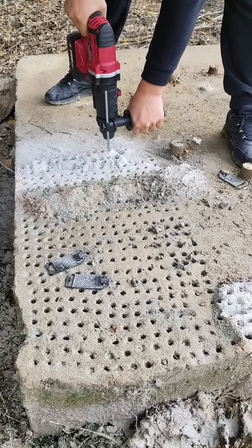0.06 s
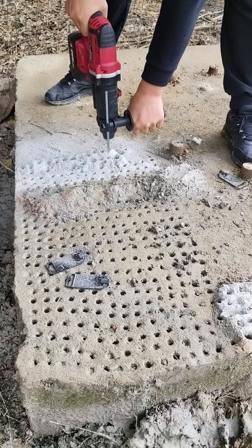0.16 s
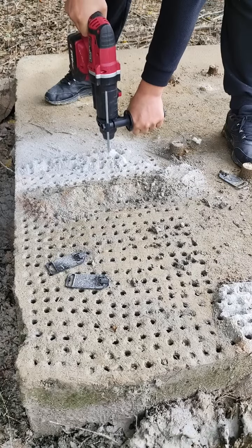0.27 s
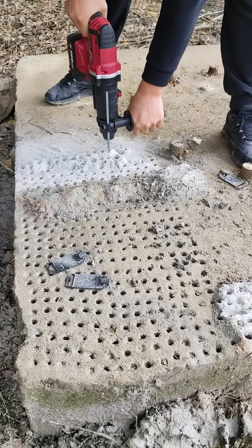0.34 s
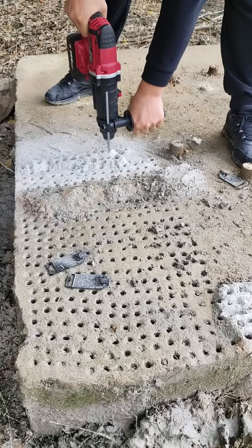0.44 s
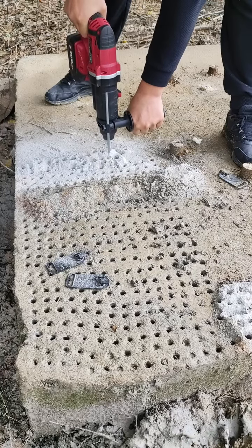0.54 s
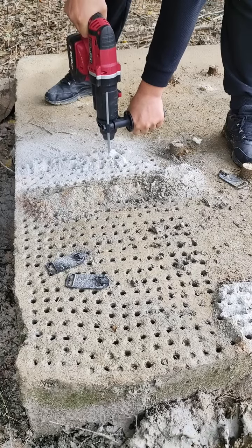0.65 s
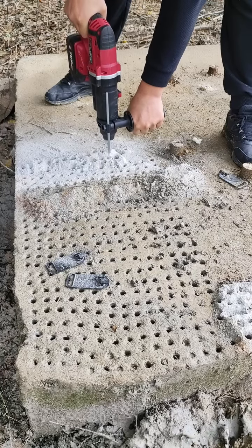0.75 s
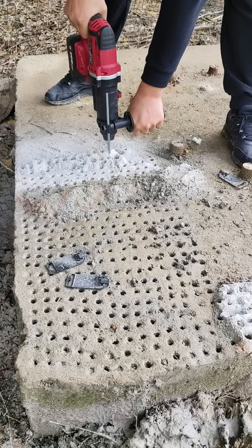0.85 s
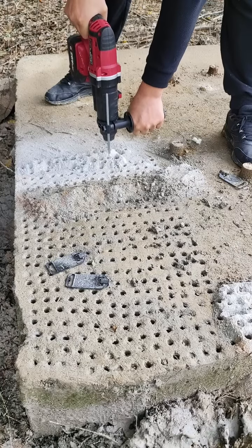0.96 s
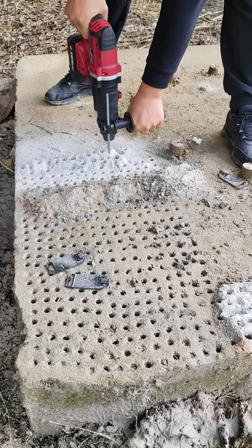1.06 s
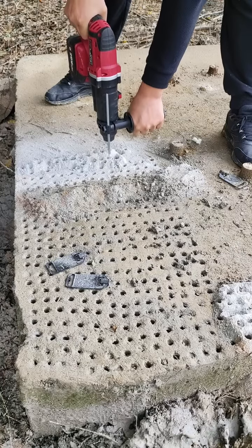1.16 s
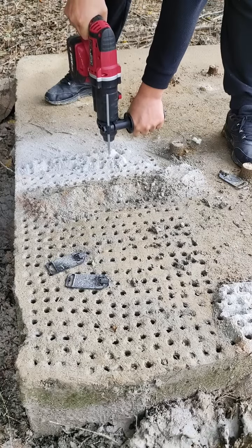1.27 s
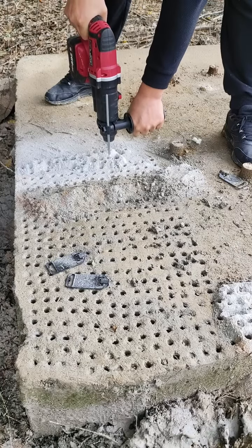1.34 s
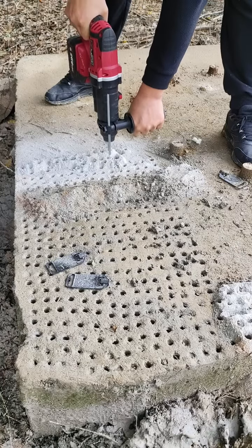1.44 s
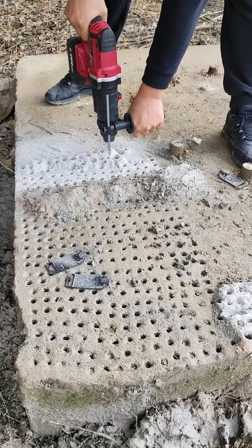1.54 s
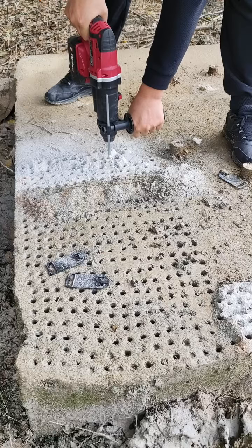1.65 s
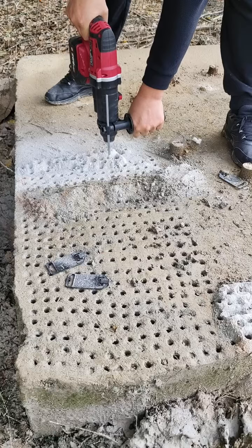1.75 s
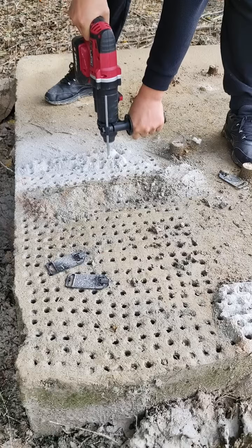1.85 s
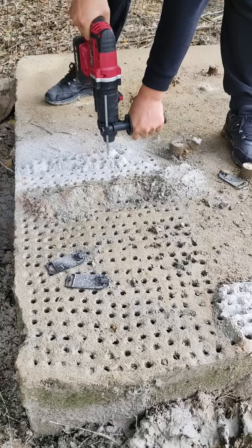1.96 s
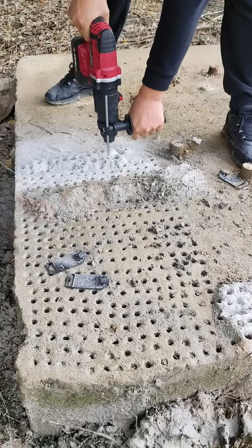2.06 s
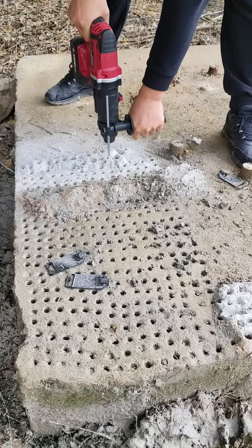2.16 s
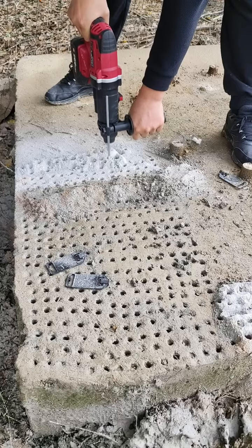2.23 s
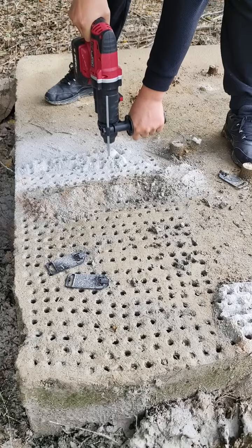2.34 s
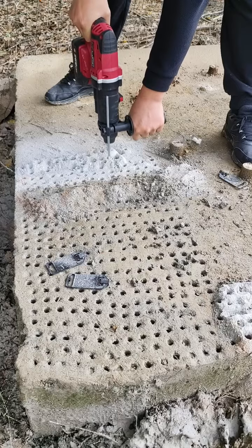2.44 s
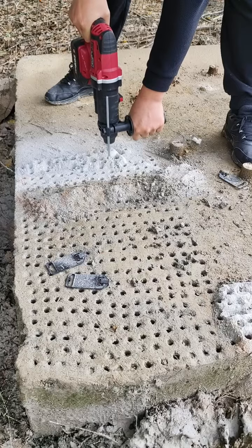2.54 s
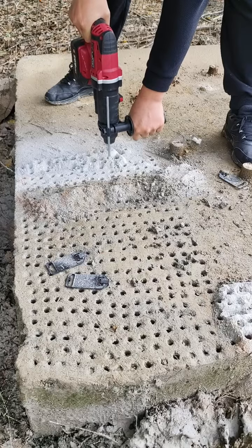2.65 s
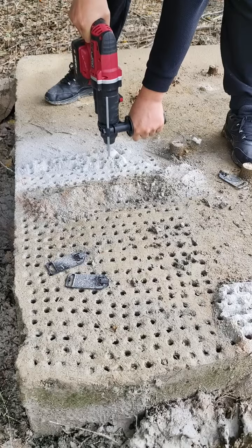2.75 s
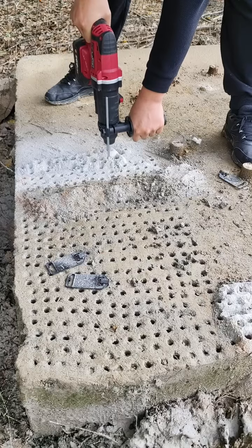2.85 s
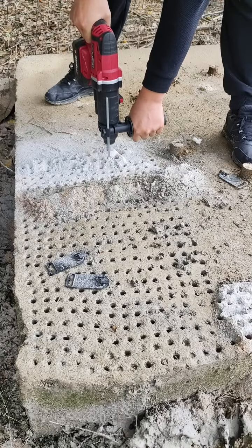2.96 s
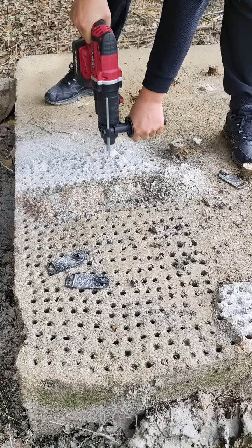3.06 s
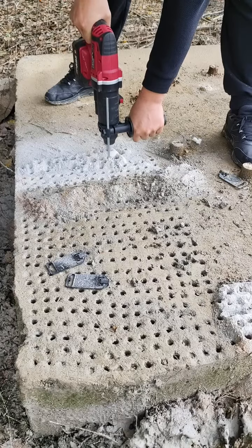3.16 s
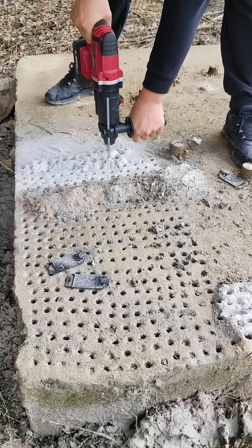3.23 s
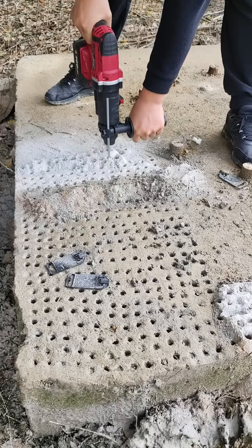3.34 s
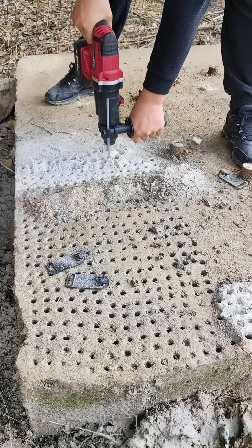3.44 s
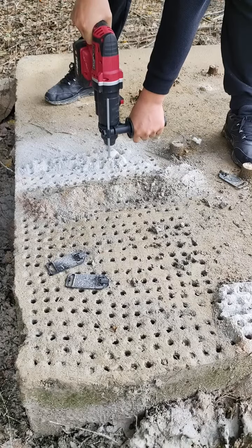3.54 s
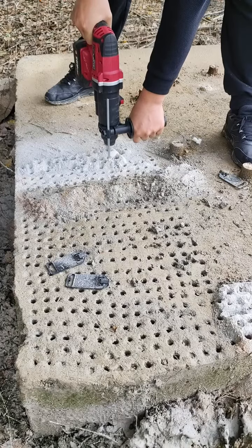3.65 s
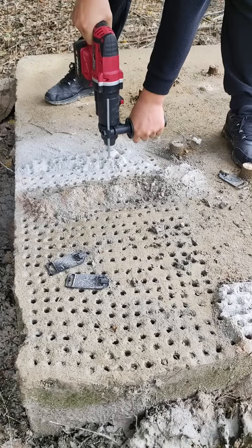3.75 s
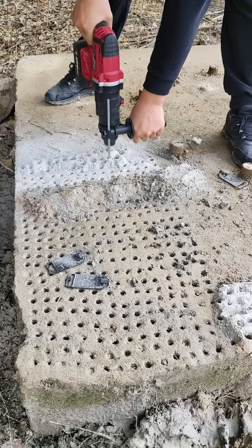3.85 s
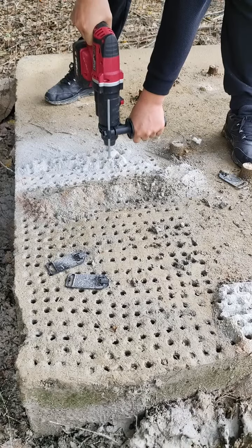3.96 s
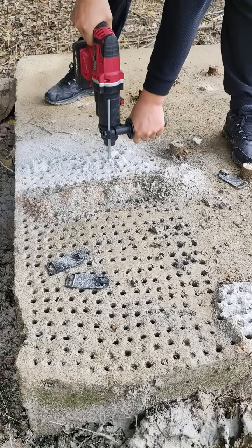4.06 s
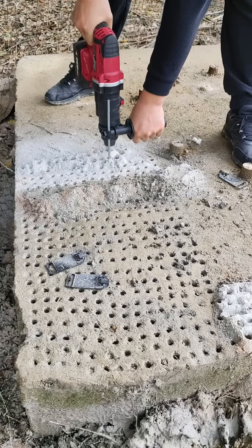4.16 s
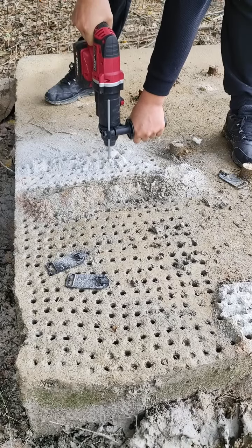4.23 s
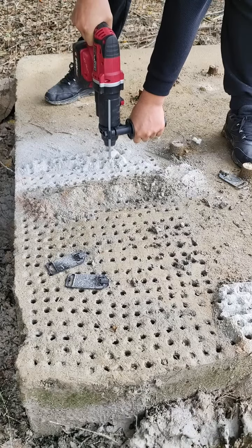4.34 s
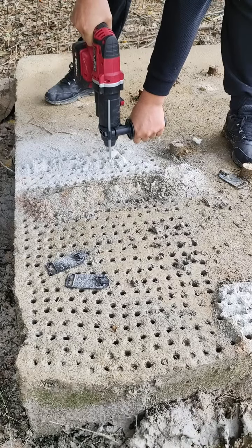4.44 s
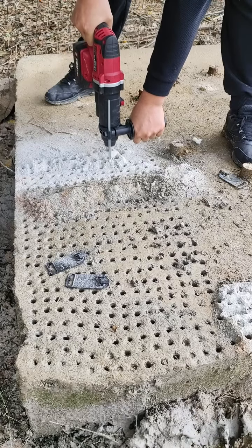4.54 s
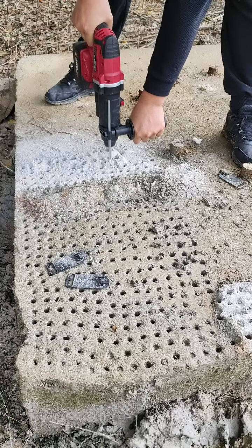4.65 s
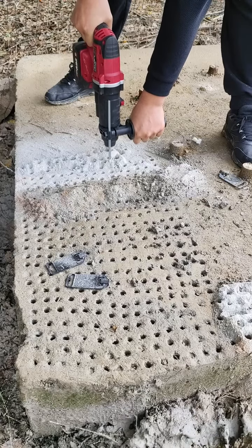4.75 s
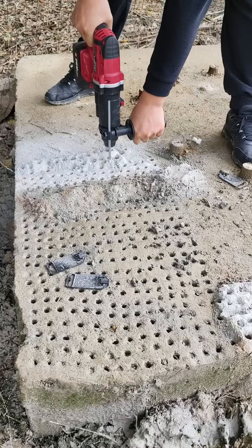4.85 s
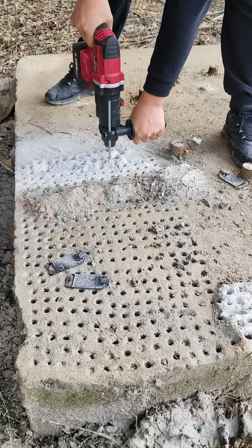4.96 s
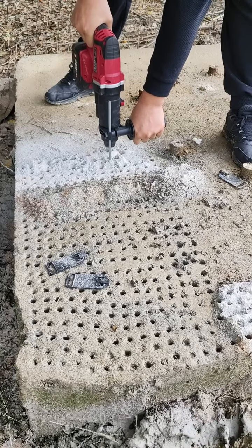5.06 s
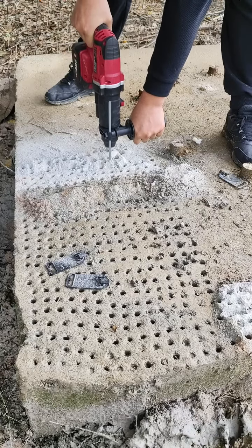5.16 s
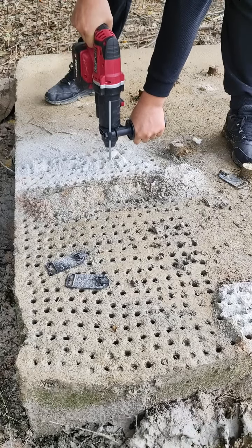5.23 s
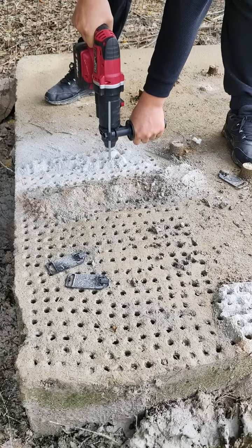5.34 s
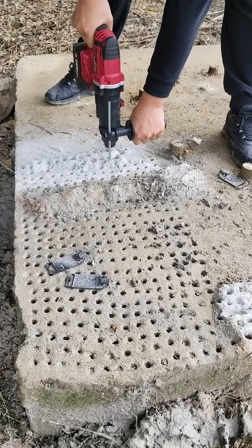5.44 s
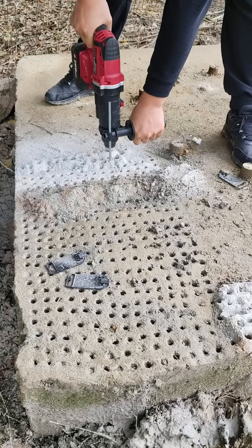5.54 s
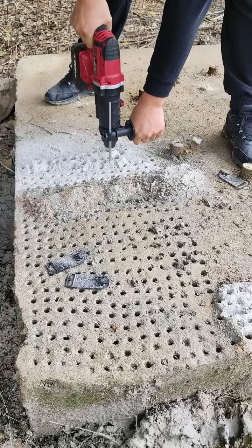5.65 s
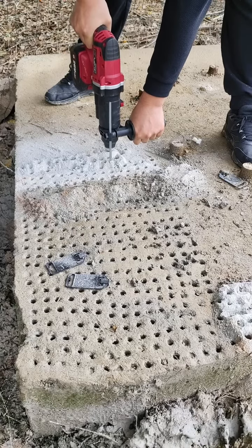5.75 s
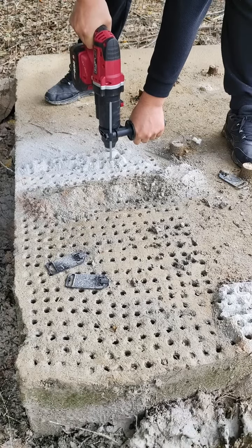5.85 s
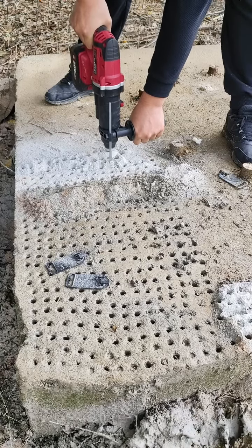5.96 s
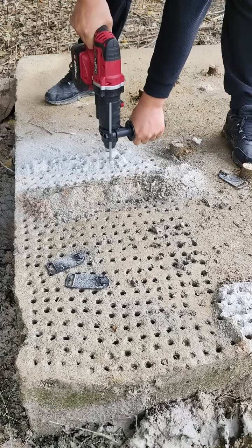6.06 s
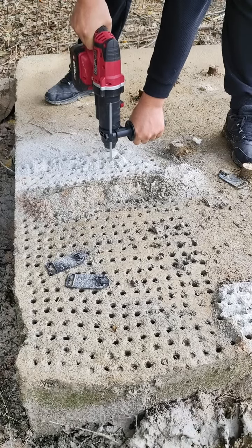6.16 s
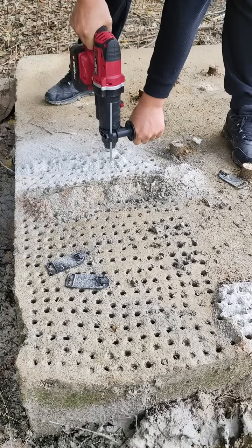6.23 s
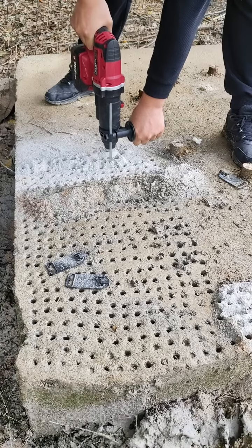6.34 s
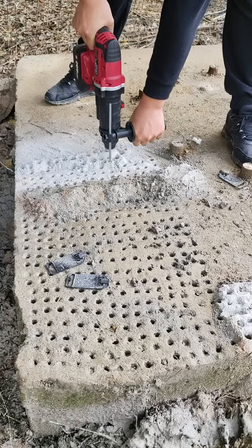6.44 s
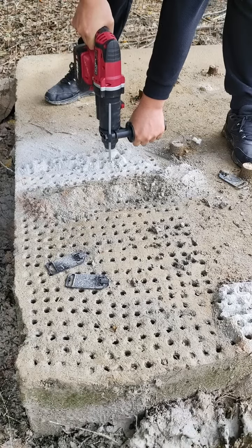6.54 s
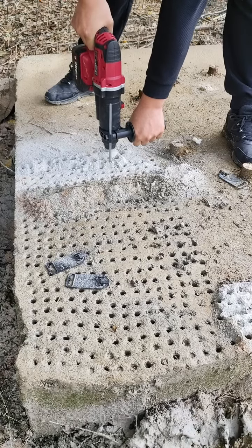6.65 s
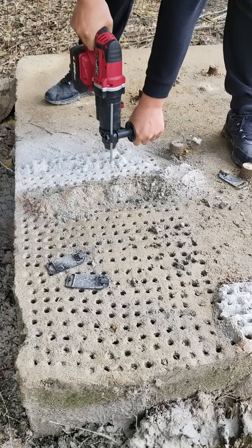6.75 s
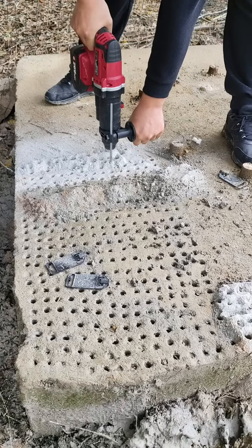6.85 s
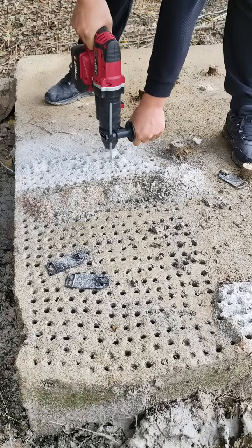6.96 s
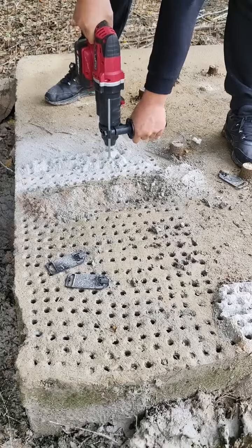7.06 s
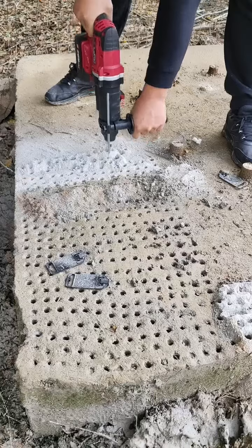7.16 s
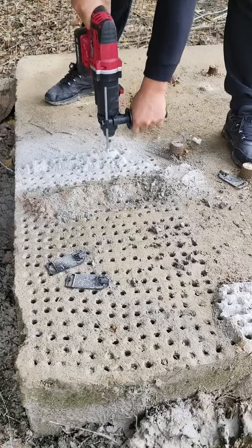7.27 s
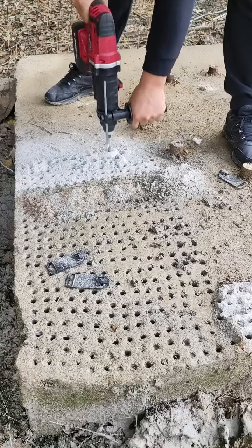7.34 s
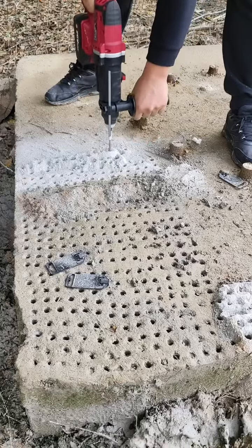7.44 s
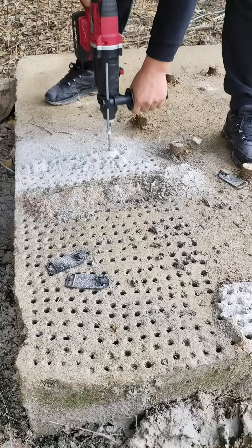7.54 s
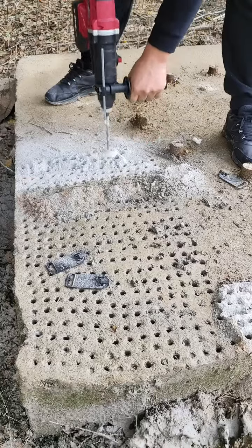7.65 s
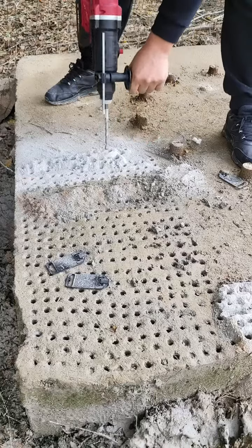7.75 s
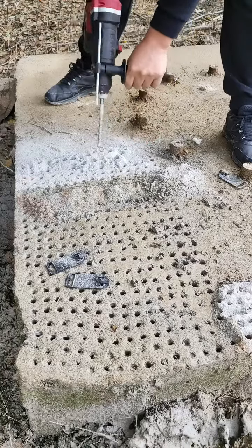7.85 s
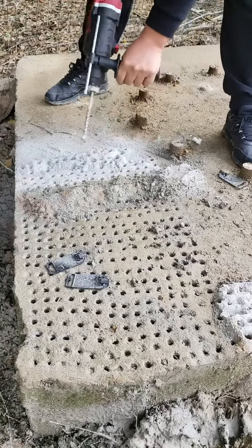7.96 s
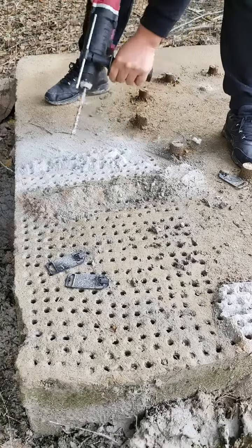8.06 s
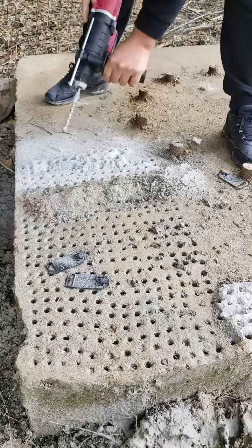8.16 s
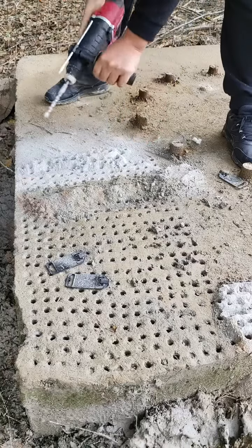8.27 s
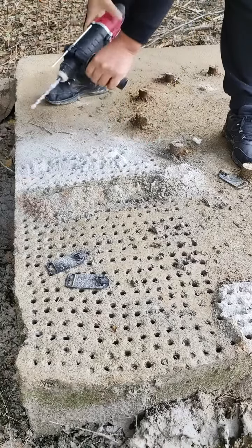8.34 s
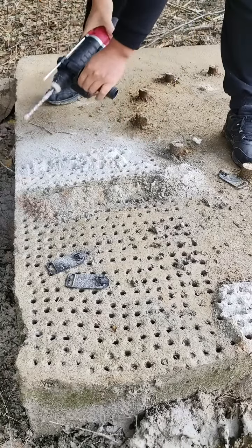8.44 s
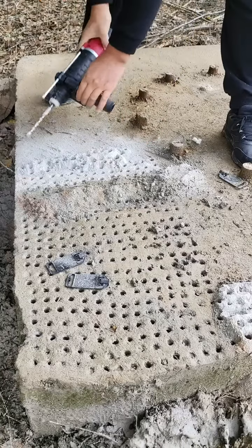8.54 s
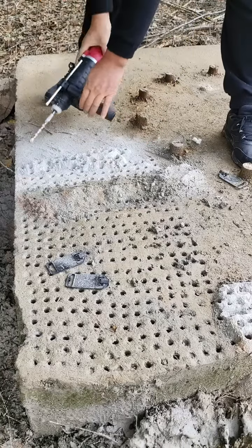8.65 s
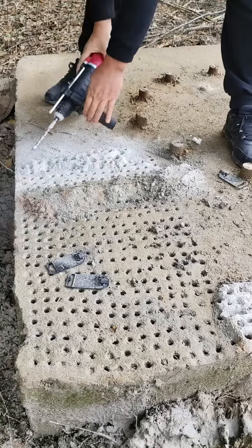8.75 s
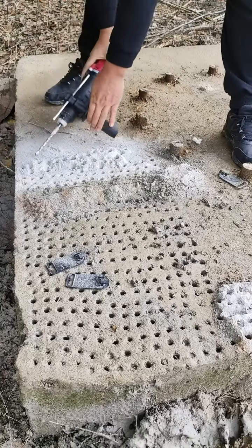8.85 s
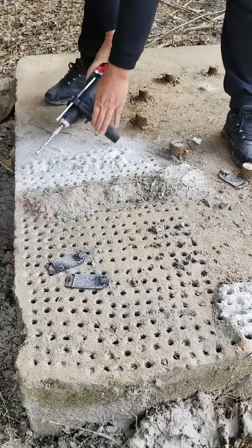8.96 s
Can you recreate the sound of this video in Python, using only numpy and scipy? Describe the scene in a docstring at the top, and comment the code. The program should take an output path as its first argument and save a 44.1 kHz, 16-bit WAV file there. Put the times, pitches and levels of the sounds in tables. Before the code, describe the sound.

A cordless rotary hammer drills loudly into a concrete slab outdoors, its rapid blows crunching grit while the gears rattle and whine. The bit chinks on stones and briefly squeaks. After about seven seconds it is pulled out with a clatter, and the motor races, then stops quickly. Over a faint low rumble, clothes rustle, a small bird chirps twice and the tool clicks in the hand.

```python
"""Outdoors, over a low rumble, a cordless rotary hammer drills into a concrete slab: about 65 blows a
second ring the bit, crush grit and make the slab boom, while the gears rattle and whine. The bit chinks
on stones, then squeaks in the hole. At 7 s it is pulled out, clattering; the motor races and is braked.
In the quiet, clothes rustle, a small bird chirps twice and the tool clicks and bumps in the hand."""
import sys
import numpy as np
from scipy import signal
from scipy.fft import rfft, irfft
from scipy.io import wavfile
from scipy.ndimage import uniform_filter1d

SR = 44100
rng = np.random.default_rng(int(sys.argv[2]) if len(sys.argv) > 2 else 0)


def put_to_file(sound):
    """Save the sound as 16-bit audio at rate SR, in the file named by the first command-line argument."""
    columns = np.atleast_2d(sound).T  # one column per channel
    safe = np.clip(columns, -1, 1)
    whole_steps = np.round(safe * 32767)
    wavfile.write(sys.argv[1], SR, whole_steps.astype(np.int16))


N = 396900
TIME = np.arange(N) / SR
WORKING_HZ = 65  # nominal crank speed: blows, rattle and clatter get louder above it


def amp(db):
    """Decibels to gain."""
    return 10 ** (np.asarray(db) / 20)


def unit_rms(x):
    """Scales to rms 1."""
    return x / np.sqrt(np.mean(x ** 2) + 1e-20)


def curve(rows):
    """An automation lane: straight lines through (seconds, value) points."""
    return np.interp(TIME, *np.transpose(rows))


def colour(x, points):
    """An EQ drawn through (Hz, dB) points on a log-frequency axis; rms 1."""
    hz, db = np.transpose(points)
    bins = np.fft.rfftfreq(N, 1 / SR)
    gain = amp(np.interp(np.log(bins + 1), np.log(hz), db))
    return unit_rms(irfft(rfft(x) * gain, N))


def wander(hz):
    """Smooth random modulation up to about hz; rms 1."""
    lowpass = np.exp(-(np.fft.rfftfreq(N, 1 / SR) / hz) ** 2)
    return unit_rms(irfft(rfft(rng.standard_normal(N)) * lowpass, N))


def tone(cycles, width_hz):
    """A sine whose phase drifts at random, blurring its pitch; rms 1."""
    drift = np.cumsum(wander(2 * width_hz)) * np.sqrt(2 * np.pi) * width_hz / SR
    return np.sqrt(2) * np.sin(2 * np.pi * cycles + drift)


def ring(x, modes):
    """Plays x through damped resonances given as (Hz, width in Hz, dB); rms 1."""
    t = TIME[:SR // 10]
    response = sum(amp(db) * np.exp(-np.pi * width * t) * np.cos(2 * np.pi * hz * t)
                   for hz, width, db in modes)
    return unit_rms(signal.oaconvolve(x, response)[:N])


def strokes(turns, phase, jitter_s, scatter_db):
    """One impulse per crank turn, at the given fraction of the turn, uneven in time and strength."""
    count = np.arange(int(turns[-1]))
    late, size = rng.standard_normal((len(count), 2)).T
    at_s = np.interp(count + phase, turns, TIME) + jitter_s * late
    samples = np.clip(at_s * SR, 0, N - 1).astype(int)
    return np.bincount(samples, amp(scatter_db * np.tanh(size)), N)


def fade(x, decay_s):
    """Gives each impulse an exponential tail."""
    return signal.lfilter([1], [1, -np.exp(-1 / (decay_s * SR))], x)


def outdoors():
    """The bed: a distant wash that swells near the end, over a low, wavering drone."""
    # Tone of the wash. Each row: frequency in Hz, relative level in dB.
    wash_eq = [(20, -21), (38, -9.5), (60, -4.5), (130, -13), (200, -24.5), (300, -30), (510, -39),
               (750, -31), (950, -31.5), (1400, -35), (2200, -44.5), (3200, -52.5), (5200, -65),
               (12000, -77.5)]
    # Fader of the wash. Each row: time in seconds, level in dB.
    wash_fader = [(0, -55), (7.9, -53.5), (8.75, -55), (8.95, -48)]
    # Notes of the drone. Each row: pitch in Hz, width in Hz, level in dB.
    drone_notes = [(53.2, 3, -56.5), (82.2, 5.5, -58)]
    drone = sum(amp(db) * tone(hz * TIME, width) for hz, width, db in drone_notes)
    return amp(curve(wash_fader)) * colour(rng.standard_normal(N), wash_eq) + drone


def bird():
    """Thin, fluttering notes of steady pitch, with a slight rasp above and below."""
    # The chirps. Each row: start in seconds, length in seconds, pitch in Hz, level in dB.
    chirps = [(8.615, .12, 3610, -79), (8.773, 0.2, 4090, -66.5)]
    out = np.zeros(N)
    for start, length, hz, db in chirps:
        progress = np.clip((TIME - start) / length, 0, 1)
        envelope = np.minimum(progress / 0.1, 1) * (1 - progress) ** 1.1
        rasp = amp(-7) * tone((hz + 260) * TIME, 130) + amp(-13) * tone((hz - 200) * TIME, 220)
        flutter = amp(2 * wander(60))
        out += amp(db) * envelope * flutter * (tone(hz * TIME, 15) + rasp)
    return out


def handling():
    """Sleeves brush, and the tool clicks and bumps in the hand as it is tipped."""
    # Rustles and clicks. Each row: peak time in seconds, level in dB, rise and decay in seconds.
    touches = [(8.08, -80, .02, .03), (8.21, -76, .012, .03), (8.52, -78, .04, .04), (8.85, -78, .04, .05),
               (8.897, -66, .002, .005), (8.909, -64, .002, .003)]
    # Their tone. Each row: frequency in Hz, relative level in dB.
    rustle_eq = [(300, -4), (1000, 6), (3000, -5), (5000, -7), (7500, -4), (10000, -11), (12000, -12)]
    envelope = sum(amp(db) * np.exp(-np.maximum((at - TIME) / rise, (TIME - at) / decay))
                   for at, db, rise, decay in touches)
    bump_s, bump_decay_s = 8.895, .014
    bump = amp(-56) * (TIME > bump_s) * np.exp(-abs(TIME - bump_s) / bump_decay_s)
    thud = colour(rng.standard_normal(N), [(100, 0), (700, 0), (1300, -12), (3000, -35)])
    rustle = colour(rng.standard_normal(N) * amp(2.5 * wander(300)), rustle_eq)
    return envelope * rustle + bump * thud


def yard(x, wet_db, t60):
    """Adds a short, scattered echo from the ground and things around."""
    t = TIME[:SR // 2]
    tail = rng.standard_normal(len(t)) * amp(-60 * t / t60) * (t > .006)
    return x + amp(wet_db) * signal.oaconvolve(x, tail / np.linalg.norm(tail))[:N]


def housing(turns, load, depth):
    """The piston shakes the whole tool: a hum on the low harmonics of crank speed."""
    # Harmonics from the first up. Each row: level under load in dB, level running free in dB.
    harmonics = [(-52.5, -42), (-50, -72), (-51.5, -53), (-48.5, -71), (-57.5, -56), (-61.5, -59)]
    hum = np.zeros(N)
    for k, (pressed, free) in enumerate(harmonics, 1):
        level = amp(load * pressed + (1 - load) * free + wander(8))
        hum += level * np.sqrt(2) * np.sin(2 * np.pi * (k * turns + rng.random()))
    damping = amp(-2 * depth ** 4.6)  # the hand bears down harder at the bottom of the hole
    return damping * hum


def gears(turns, speed, load, depth):
    """Meshing teeth whine as they sweep the resonances of the case; backlash smears the upper tones."""
    # Pitches of the main mesh and two upper ones, in multiples of crank speed.
    orders = (58, 116.5, 145)
    # Case resonances under the main mesh. Each row: frequency in Hz, response in dB.
    case_ring = [(3480, -50), (3550, -44), (3620, -36), (3710, -34), (3850, -36.5), (3980, -32),
                 (4170, -36.5), (4280, -32)]
    # How well the case radiates the upper meshes. Each row: frequency in Hz, response in dB.
    case_treble = [(6900, -45.5), (7400, -42), (7700, -41.5), (8200, -55), (8700, -48), (9000, -46.5),
                   (9400, -39.5), (9600, -43), (10000, -54), (11000, -64)]
    jolted = turns + 0.0017 * np.sin(2 * np.pi * turns)  # every stroke jolts the gears
    main_cycles = orders[0] * jolted
    whine = tone(main_cycles, 10) + amp(-3) * wander(220) * tone(main_cycles, 62.5)
    strain = amp(2 * np.cos(2 * np.pi * (turns - .85)))  # the teeth bear hardest just before the blow
    whine_db = np.interp(orders[0] * speed, *np.transpose(case_ring)) - 2.5 * depth
    out = amp(whine_db) * unit_rms(strain * whine)
    for order in orders[1:]:
        upper_db = np.interp(order * speed, *np.transpose(case_treble)) + 1.5 - 0.5 * (1 - load)
        backlash = amp(3.2 * wander(250) + 1.5 * wander(21) + 2 * np.cos(2 * np.pi * (turns - .4)))
        out += amp(upper_db) * unit_rms(tone(order * jolted, 170) * backlash)
    acceleration = np.gradient(uniform_filter1d(speed, size=SR // 20), TIME)
    return amp(0.0565 * acceleration) * out  # torque makes the teeth whine louder


def mechanism(turns, speed, load):
    """Gears, fan and bit rattle; half lifted, the bit clatters; the gears growl as the motor slows."""
    # Tone of the rattle. Each row: frequency in Hz, relative level in dB.
    rattle_eq = [(30, -26), (100, -11.5), (340, -13), (650, -0.5), (950, -1.5), (1500, -1), (2250, -0.5),
                 (3000, -2), (4000, 1), (4700, -3.5), (6200, -6), (7400, -4.5), (9600, -7), (10900, -13),
                 (12000, -11.5)]
    # Bit and chuck, kept ringing by the rattle. Each row: pitch in Hz, width in Hz, relative dB.
    steel_modes = [(1338, 110, -1), (1552, 108, 1), (1978, 150, -1), (2227, 120, 0), (2780, 200, -3),
                   (4055, 120, 1), (4280, 150, -6.5), (4840, 250, -1.5), (5530, 220, -8), (9570, 230, -1),
                   (11640, 350, -0.5)]
    # The bit chattering loose in its chuck. Each row: pitch in Hz, width in Hz, relative dB.
    loose_modes = [(686, 260, -3.5), (1060, 200, -0.5), (1550, 150, 1.5), (2010, 120, -6), (2280, 130, -1),
                   (3800, 500, -16)]
    # Tone of the growl. Each row: frequency in Hz, relative level in dB.
    growl_eq = [(500, -30), (900, -10), (1080, 2), (1270, 1), (1400, -11), (1550, -6), (2200, -25),
                (4000, -45)]
    # Fader of the growl. Each row: time in seconds, level in dB.
    growl_fader = [(7.55, -75), (7.66, -33), (7.8, -38)]
    extra_hz = speed - WORKING_HZ
    grain = amp(1.35 * wander(350) + .6 * wander(33) + 1.05 * np.cos(2 * np.pi * (turns - .2)))
    hiss = colour(grain * rng.standard_normal(N), rattle_eq)
    steel = ring(grain * rng.standard_normal(N), steel_modes)
    rattle = amp(-34 + 0.2844 * extra_hz - 5.5 * (1 - load)) * (amp(5) * hiss + amp(1.07) * steel)
    taps = (rng.random(N) < 420 / SR) * rng.uniform(-0.9, 1, N)  # about 420 a second
    looseness = np.sqrt(load * (1 - load))
    clatter = amp(-31 + 0.46 * extra_hz) * looseness * ring(taps, loose_modes)
    growl = amp(curve(growl_fader)) * colour(grain * rng.standard_normal(N), growl_eq)
    return rattle + clatter + growl


def stones():
    """The bit chinks on hard stones and squeaks against the wall of the hole."""
    # The chinks. Each row: start in seconds, strength in dB.
    stone_hits = [(2.9355, -24), (2.9744, -21.5), (3.1101, -21), (3.7123, -21.5)]
    # The squeaks. Each row: peak time in seconds, level in dB.
    squeaks = [(4.12, -33), (4.31, -43), (4.46, -38.5)]
    squeak_hz, swell_s = 11360, 0.014
    hits = np.zeros(N)
    for start, db in stone_hits:
        hits[int(start * SR)] = amp(db)
    bright = colour(rng.standard_normal(N), [(2500, -26), (4700, 2.5), (6000, 0.5), (9000, -11.5)])
    chinks = amp(-0.5) * fade(hits, decay_s=0.0036) * bright
    rub = sum(amp(db) * np.exp(-((TIME - at) / swell_s) ** 2) for at, db in squeaks)
    return chinks + rub * tone(squeak_hz * TIME, width_hz=150.3)


def slab(knock):
    """The slab booms in a few low modes, whose level and balance follow the bite of the bit."""
    # Slab modes. Each row: pitch in Hz, width in Hz, relative dB at a shallow bite and at a deep one.
    modes = [(464, 45, -19, -10.5), (525, 49, -3.5, 0), (577, 40, 0.5, -4), (655, 40, -10, -4.5),
             (721, 37, -6, -1), (877, 61, -4.5, -11)]
    # How deep the bit bites. Each row: time in seconds, bite from 0 to 1.
    bite_lane = [(1.6, 0.1), (1.9, 0.92), (3.6, 0.88), (4.5, 0.24), (6.8, 0.14), (7.0, 0.8), (7.2, 0.04)]
    bite = curve(bite_lane)
    boom = sum(amp((1 - bite) * shallow + bite * deep) * ring(knock, [(hz, width, 0)])
               for hz, width, shallow, deep in modes)
    # little of the boom sounds below about 450 Hz
    boom = colour(boom, [(300, -28), (395, -16.5), (470, 0.5), (900, -0.5), (1300, -19.5)])
    return amp(-41.5 + 3.5 * bite) * boom


def hammer(turns, speed, load, depth):
    """Each stroke, the bit seats and knocks the slab; then the blow rings the tool and crushes stone."""
    # Ring of the struck bit and housing. Each row: pitch in Hz, width in Hz, relative dB.
    tool_modes = [(1316, 120, -6), (1400, 120, -9), (1570, 130, -4), (1650, 860, -0.5), (1990, 180, -4),
                  (2210, 130, -10), (2690, 170, -10.5), (3940, 250, -12)]
    # Tone of crushing grit. Each row: frequency in Hz, relative level in dB.
    crunch_eq = [(200, -16.5), (370, -15), (530, -3.5), (740, -0.5), (980, -10), (1300, -0.5), (1600, -1.5),
                 (1800, 1), (2200, 0), (2700, -6.5), (4500, -7), (8000, -10.5), (10700, -27),
                 (12000, -15.5)]
    knock = strokes(turns, phase=.885, jitter_s=.00015, scatter_db=2)
    blow = strokes(turns, phase=.04, jitter_s=.0002, scatter_db=2)
    blow *= amp(np.tanh(wander(12)))  # hard and soft runs of blows
    tool = ring(-blow - amp(-6.5) * knock, tool_modes)
    # the contact lasts a moment, which rounds off the treble
    tool = colour(tool, [(250, -7.5), (700, -2), (2000, 2.5), (6000, -17.5)])
    crushing = fade(blow + amp(-3) * knock, decay_s=.0078)
    crunch = colour(crushing * rng.standard_normal(N), crunch_eq)
    # chips crack off, bright and sharp, a few much louder than the rest
    cracks = strokes(turns, phase=.033, jitter_s=.00037, scatter_db=12) * amp(3.9 * wander(10))
    chips = colour(fade(cracks, decay_s=.001) * rng.standard_normal(N),
                   [(1000, -25), (4500, -3), (8000, 1.5), (10500, -11.5), (12000, -4)])
    buried = depth ** 3.2  # dust packs the hole near the end: softer blows, a larger share of grit
    force = amp(-30 + 0.21 * (speed - WORKING_HZ) - 4 * buried)
    strike = amp(-2.5) * tool + amp(-3.6 + 5 * buried) * crunch + amp(-8.5) * chips
    return load * (force * strike + slab(knock))


def scene():
    """Crank speed, load and hole depth play the drill; handling, bird and outdoor bed sit behind it."""
    # The crank sags as the hole deepens, races once the bit is lifted, then is braked.
    # Each row: time in seconds, strokes per second.
    speed_lane = [(0.0, 66.41), (1.04, 63.6), (1.55, 63.27), (1.93, 66.65), (2.49, 65.45), (3.02, 66.28),
                  (4.13, 65.35), (5.71, 62.93), (6.25, 60.88), (6.44, 61.57), (6.74, 59.79), (7.01, 61.58),
                  (7.24, 72.9), (7.36, 71.73), (7.46, 74.87), (7.67, 71.94), (7.8, 60.36), (7.9, 41.24)]
    # How hard the bit is pressed in. Each row: time in seconds, load from 0 to 1.
    load_lane = [(0, 1), (7.0, 1), (7.13, 0.58), (7.2, 0.34), (7.6, 0.17), (7.72, 0.14)]
    # The drill dies away as the motor is braked. Each row: time in seconds, gain in dB.
    brake_fader = [(7.805, -1.5), (7.83, -9), (7.865, -19), (7.9, -60)]
    lift_at_s, lift_s = 7.0, .5  # the bit sinks steadily, then is drawn out
    speed, load = curve(speed_lane), curve(load_lane)
    turns = np.cumsum(speed) / SR
    depth = np.clip(np.minimum(TIME / lift_at_s, 1 - (TIME - lift_at_s) / lift_s), 0, 1)
    drill = (hammer(turns, speed, load, depth) + stones() + mechanism(turns, speed, load)
             + gears(turns, speed, load, depth) + housing(turns, load, depth))
    drill = yard(drill * amp(curve(brake_fader)), wet_db=-15.5, t60=0.33)
    return (drill + handling() + bird() + outdoors())[None]


def record(dry):
    """The microphone sheds the deepest bass, and a steep high cut takes off the top."""
    low_cut = signal.butter(4, 36, "highpass", fs=SR, output="sos")
    high_cut = signal.firwin(1023, 12120, window=("kaiser", 11), fs=SR)
    return signal.oaconvolve(signal.sosfilt(low_cut, dry), high_cut[None], "same")


dry = scene()
out = record(dry)
put_to_file(out)
```